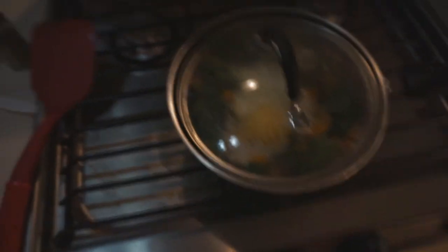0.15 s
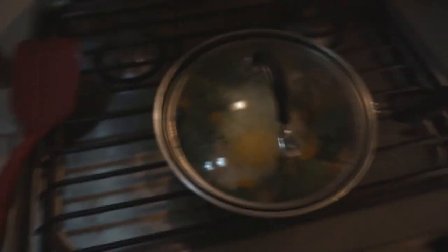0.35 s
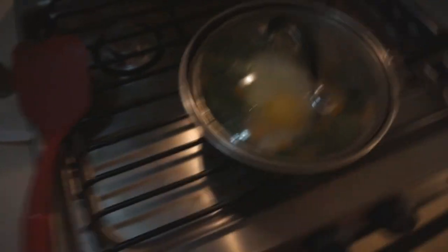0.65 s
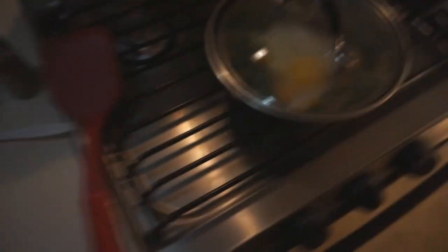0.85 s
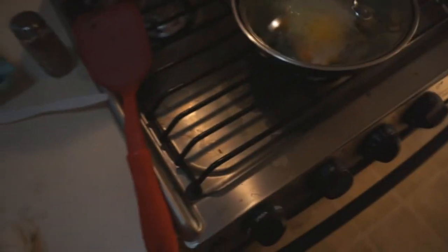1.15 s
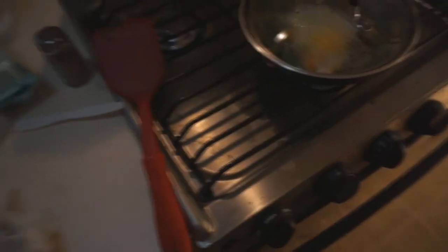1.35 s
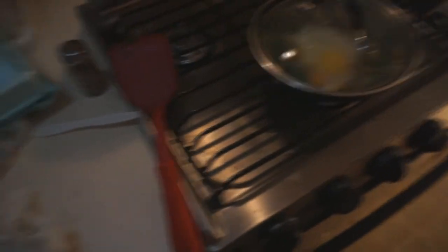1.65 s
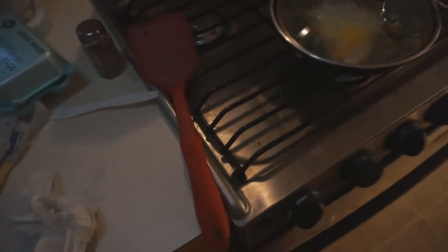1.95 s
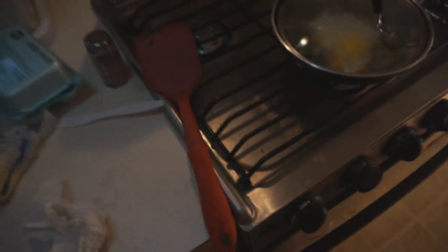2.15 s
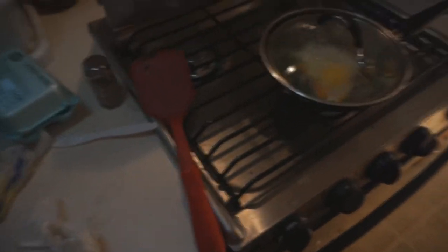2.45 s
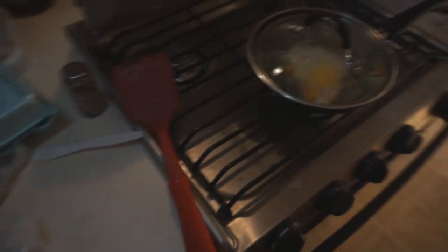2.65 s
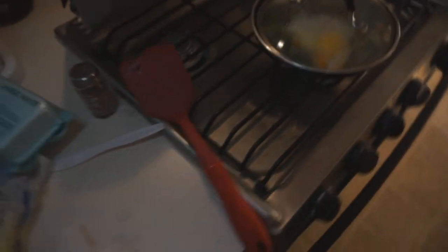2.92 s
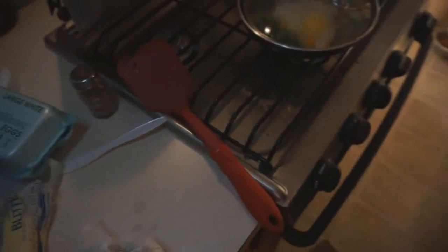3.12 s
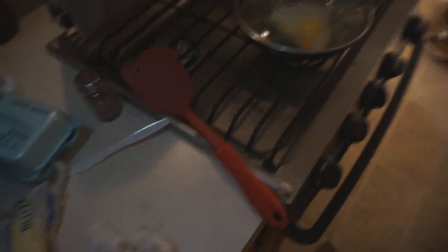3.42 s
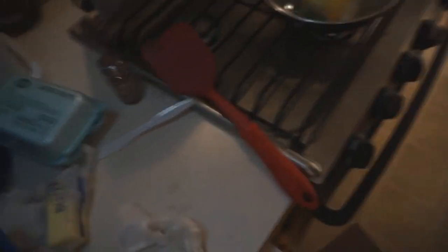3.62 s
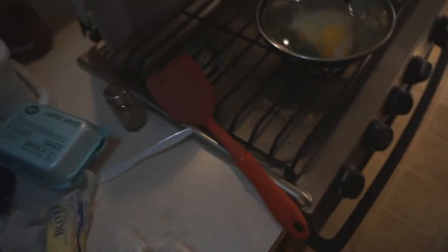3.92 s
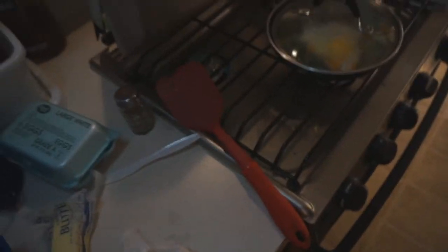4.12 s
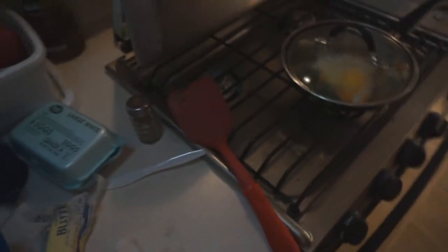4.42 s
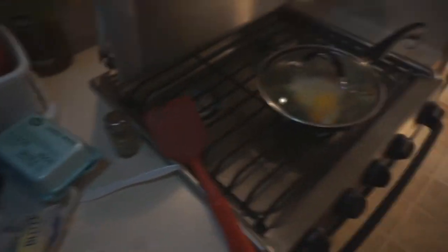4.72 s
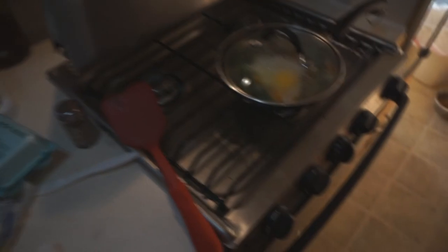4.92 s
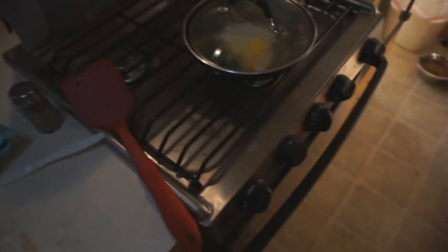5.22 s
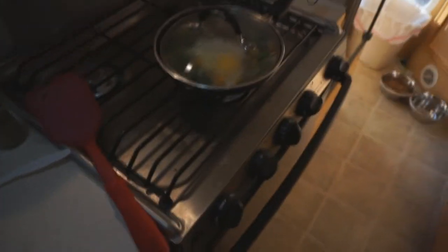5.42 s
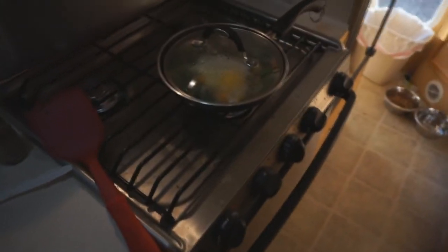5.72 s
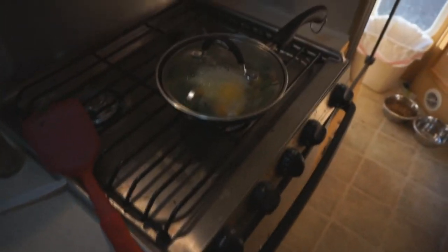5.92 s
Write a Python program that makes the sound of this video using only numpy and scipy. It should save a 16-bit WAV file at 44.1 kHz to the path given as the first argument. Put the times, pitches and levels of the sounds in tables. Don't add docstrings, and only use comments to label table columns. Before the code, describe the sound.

Bright, dense sizzling of an egg and vegetables frying in butter, with constant sharp pops, small bubbling gulps, then knocks and scrapes nearby.

```python
import sys
import numpy as np
from scipy import signal
from scipy.fft import rfft, irfft, next_fast_len
from scipy.io import wavfile
from scipy.ndimage import map_coordinates

SR = 44100
rng = np.random.default_rng(int(sys.argv[2]) if len(sys.argv) > 2 else 0)


def magnitude_from_level(level_db):
    exponent = np.asarray(level_db, float) / 20
    return 10 ** exponent


def generate_wav(signal):
    frames = np.transpose(np.atleast_2d(signal))
    scaled = np.clip(frames, -1, 1) * 32767
    pcm = np.round(scaled).astype(np.int16)
    wavfile.write(sys.argv[1], SR, pcm)


N = 267687

# (time [s], level [dB])
SIZZLE_LEVEL = [
    (0.0, -29.5),
    (0.49, -27),
    (0.81, -28),
    (1.35, -26.5),
    (2.01, -29),
    (3.29, -28.5),
    (4.58, -31),
    (5.41, -30.5),
    (6.07, -31),
]
# (time [s], peak level [dB])
LARGE_POPS = [(0.2389, -3), (0.4115, -8), (0.5144, -8), (0.5784, -7), (0.7173, -8), (0.7696, -8),
              (0.8056, -8), (0.9078, -6), (0.9213, -4), (1.048, -6), (1.2111, -4), (1.2306, -7),
              (1.5574, -8), (1.8173, -8), (1.8507, -8), (2.0624, -9), (2.3486, -9), (2.5262, -10),
              (2.7462, -9), (2.8883, -8), (2.9811, -8), (3.1258, -6), (3.5369, -9), (4.3311, -12),
              (4.6009, -10), (4.9487, -8), (5.2185, -8), (5.2584, -8), (5.464, -9), (5.6151, -9)]
# (burst pitch [Hz], rate [1/s], level [dB], spread of direction [rad])
BUBBLE_SIZES = [(1200, 400, -13.5, 0.47), (2470, 1200, -8.5, 0.19), (5600, 1500, -2.5, 0.11),
                (10400, 4300, 4.5, 0.5), (14500, 3900, 3, 0.53), (7660, 150, -1.5, 1.0)]
# (frequency [Hz], level per Hz [dB])
PAN_SPECTRUM = [(90, -85), (170, -21), (244, -5.5), (398, 0), (600, -2), (736, -8), (1150, -17), (1400, 3),
                (1600, 2.5), (2320, 0.5), (5000, 1.5), (9000, 1.5), (14500, 3.5), (16500, -3.5)]
# (time [s], peak level [dB], pitch [Hz], t60 [s])
STEAM_GULPS = [(0.202, -29.5, 603, 0.056), (0.225, -34, 624, 0.045), (0.315, -34, 364, 0.055),
               (0.401, -27.5, 507, 0.038), (0.419, -34.5, 486, 0.12), (0.485, -20.5, 527, 0.034),
               (0.507, -24.5, 546, 0.033), (0.519, -38, 522, 0.21), (0.731, -30, 460, 0.026),
               (0.829, -48, 604, 0.07), (0.899, -42, 550, 0.083), (1.121, -34, 511, 0.063),
               (1.172, -36, 340, 0.065), (1.253, -39, 720, 0.22), (1.28, -36, 310, 0.064),
               (1.764, -29.5, 392, 0.029), (1.837, -15, 560, 0.016), (2.359, -37, 310, 0.092),
               (2.426, -29.5, 640, 0.05), (2.481, -34, 362, 0.041), (2.563, -45.5, 390, 0.11),
               (2.803, -33.5, 557, 0.058), (2.905, -45, 350, 0.068), (4.449, -37.5, 577, 0.061),
               (5.322, -37, 374, 0.038), (5.351, -41, 370, 0.043), (0.539, -40.5, 821, 0.18),
               (1.031, -30.5, 1570, 0.06)]
# (time [s], peak level [dB], main resonance [Hz], rattle level [dB])
BLOWS = [(1.3255, -4.5, 780, -7.5), (1.3291, -9, 1200, -11), (1.339, -11, 790, -3), (2.325, -17.5, 420, -9),
         (2.727, -25.5, 437, -4), (2.743, -33, 328, 3.5), (3.687, -14.5, 294, 5), (3.785, -8.5, 563, -9),
         (3.831, -10, 1020, 2.5), (4.136, -13, 573, 0), (4.981, -16.5, 663, 5), (4.984, -21.5, 990, 8),
         (5.094, -31, 610, 6.5), (5.239, -25, 880, 4), (5.243, -26, 440, 1), (5.289, -34.5, 490, 7),
         (5.9432, -20, 4400, 3.5), (5.9437, -13, 2890, -10), (5.949, -13, 3160, -11.5),
         (5.957, -22, 2980, -3), (5.985, -26, 2950, 0)]
# (time [s], peak level [dB], main resonance [Hz], rattle level [dB])
SOFT_SCUFFS = [(3.27, -37, 385, -3), (3.298, -27.5, 1500, 11.5), (3.376, -20, 2150, 3),
               (3.397, -27, 1830, 1), (3.692, -17, 2340, -7), (3.747, -15, 1580, -10),
               (3.85, -18.5, 1120, 11.5), (3.872, -26, 1160, 10), (3.907, -25, 1560, -10),
               (3.96, -8, 1680, -2.5), (3.972, -15, 2000, -4), (4.038, -16, 1820, -2),
               (4.097, -32, 1660, 2), (4.137, -14.5, 2420, 2.5), (4.191, -19.5, 2450, 6.5),
               (4.206, -13, 2320, -0.5), (4.226, -18.5, 1350, 3.5), (4.25, -31, 1440, 7),
               (5.559, -36, 1080, -6)]
# (frequency [Hz], level per Hz [dB])
CLATTER_SPECTRUM = [(88, -80), (150, -16.5), (372, -8.5), (713, -5), (922, -10.5), (1210, -2), (1440, -4.5),
                    (6170, -7.5), (9000, -10), (11700, 0), (19800, -120)]
# (frequency [Hz], level [dB], t60 [s])
BOWL_MODES = [(205, -10, .3), (301, -5, .2), (838, 0, .5), (1001, -2, .2), (2230, -8, .08)]
# (time [s], length [s], level [dB])
FLOOR_DRAGS = [
    (3.298, 0.1, -30.5),
    (3.7, 0.43, -20),
]
# (time [s], peak level [dB])
WEIGHT_SHIFTS = [(0.159, -56), (0.299, -81), (0.732, -53), (0.896, -67), (1.178, -50), (1.333, -29.5),
                 (1.549, -64), (1.716, -48.5), (1.838, -50), (2.146, -67), (2.332, -46), (2.444, -45.5),
                 (2.549, -60), (2.734, -37), (2.797, -50), (3.089, -69), (3.295, -43.5), (3.401, -43.5),
                 (3.689, -21), (3.79, -40), (3.959, -38.5), (4.158, -40), (4.299, -54), (4.448, -58),
                 (4.973, -54), (5.089, -53), (5.244, -59), (5.499, -64), (5.694, -79), (5.946, -38.5)]
# (frequency [Hz], width [Hz], level [dB])
FLOOR_MODES = [(113, 21, 36), (190, 60, -50)]
# (frequency [Hz], level [dB])
RUMBLE_SPECTRUM = [(20, -33), (60, 13.5), (120, -9), (200, 0), (400, -12.5), (800, -90)]
# (frequency [Hz], left-right likeness [-1 to 1])
LIKENESS = [(60, 0.3), (180, 0.94), (550, 0.3), (1650, 0.65), (4970, 0.13), (15000, 0.19)]
# (frequency [Hz], lead of the left [rad])
LEFT_LEAD = [(0, 0.9), (2840, 0.27), (11900, 0.45), (15900, -1.5)]
# (frequency [Hz], left gain [Np], the right has the opposite)
LEFT_GAIN = [(2000, -0.086), (14000, -0.015)]
# (frequency [Hz], t60 [s])
CABIN_T60 = [(200, 0.21), (2000, 0.092), (12000, 0.025)]
# (frequency [Hz], t60 [s])
STOVE_T60 = [(1000, 0.042), (12000, 0.048)]
# (frequency [Hz], width [Hz], depth [0-1])
ECHO_NOTCHES = [(1760, 260, .92), (3450, 240, .55)]
# (frequency [Hz], level [dB])
MIC_RESPONSE = [(20, -26), (60, -14), (110, 0), (15900, 0), (16150, -30), (16500, -90)]
# (time [s], left-right level [dB])
CAMERA_TURN = [(0.0, 2), (1.98, 0), (2.59, -0.5), (3.41, 1), (4.18, -1), (4.46, 0), (4.77, -1.5),
               (5.14, 1.5), (5.68, 5), (6.07, 3.5)]
# (time [s], drop [dB], negative means none)
GAIN_DROPS = [(.115, 1.5), (0.239, 1.5), (.446, 2.5), (.58, 0.5), (0.702, 4.5), (0.925, 2.5), (1.05, 1.5),
              (1.324, 2.5), (1.558, 1.5), (1.817, 2.5), (1.87, 2), (2.021, 2), (2.292, 1), (2.44, 0.5),
              (2.82, 0.5), (2.931, 3), (3.129, 2), (3.44, 0), (3.535, 2.5), (3.73, 1.5), (3.89, 2),
              (4.28, 1), (4.333, 2.5), (4.603, 0.5), (4.69, 1), (4.952, 1), (5.19, -14), (5.617, 3),
              (5.99, 1)]

SPITS, SPIT_DB, SPIT_SPREAD_DB = 240, -8.5, 3.5
BODY_DB, BODY_SPREAD_DB = -9, 4
KNOCK_RISE_S, KNOCK_T60_S = 0.0007, 0.047
SCUFF_RISE_S, SCUFF_T60_S = 0.0038, 0.1
DRAG_RISE_DB_PER_S, DRAG_FADE_DB_PER_S = 302, 60
STEP_RISE_S, STEP_FADE_DB_PER_S, SHUFFLE_DB, THUD_DB = 0.018, 121, -0.5, -2
DUCK_FALL_S, DUCK_RETURN_S = 0.0046, 0.04


def unit(x):
    return x / np.sqrt(np.mean(x ** 2) + 1e-20)


def along(points, hz):
    f, v = np.transpose(points)
    return np.interp(np.log(hz + 1), np.log(f + 1), v)


def curve(points):
    s, v = np.transpose(points)
    return np.interp(np.arange(N) / SR, s, v)


def wobble(rate):
    knots = rng.standard_normal(int(N * rate / SR) + 4)
    return map_coordinates(knots, [np.arange(N) * rate / SR])


def filtered(x, response):
    n = x.shape[-1]
    m = next_fast_len(n + 4096)
    spectrum = rfft(x, m) * response(np.fft.rfftfreq(m, 1 / SR))
    return irfft(spectrum, m)[..., :n]


def colour(points):
    return lambda hz: magnitude_from_level(along(points, hz))


def resonance(hz, centre_hz, width_hz):
    damping = 1j * hz * width_hz
    return damping / (centre_hz ** 2 - hz ** 2 + damping)


def sides(pan_db):
    return magnitude_from_level(np.array([pan_db / 2, -pan_db / 2]))


def stereo_noise():
    def split(hz):
        angle = np.arccos(np.clip(along(LIKENESS, hz), -1, 1)) / 2
        return np.array([np.cos(angle), np.sin(angle)])
    mid, side = filtered(rng.standard_normal((2, N)), split)
    return np.array([mid + side, mid - side])


def reverberate(x, t60s):
    hz, t, z = signal.stft(rng.standard_normal((2, SR // 4)), SR, nperseg=128)
    decay = magnitude_from_level(-60 * t / along(t60s, hz)[:, None])
    tail = signal.istft(z * decay, SR, nperseg=128)[1]
    tail = tail / np.linalg.norm(tail[0])
    delayed = np.pad(x, (60, 0))[None]
    return signal.fftconvolve(delayed, tail, axes=1)[:, :N]


def sizzle():
    level_db = curve(SIZZLE_LEVEL)
    source = crackle(level_db) + pops()
    walls = magnitude_from_level(-13) * reverberate(source[0], STOVE_T60) + magnitude_from_level(-9) * reverberate(source[1], CABIN_T60)
    hiss_gain = magnitude_from_level(level_db - 5.5 + 1.2 * wobble(30))
    hiss = hiss_gain * unit(filtered(stereo_noise(), colour(PAN_SPECTRUM)))

    def path(hz):
        between_ears = .5j * along(LEFT_LEAD, hz) + along(LEFT_GAIN, hz)
        notches = np.prod([1 - depth * resonance(hz, c, w) for c, w, depth in ECHO_NOTCHES], axis=0)
        return np.exp(between_ears * np.array([[1], [-1]])) * notches
    return sides(curve(CAMERA_TURN)) * filtered(source + walls + hiss, path)


def crackle(level_db):
    clumps = sputter(90, life=.0007, boost=2.5)
    total = np.zeros((2, N))
    for hz, rate, db, width in BUBBLE_SIZES:
        total += magnitude_from_level(db + 0.96 * wobble(7)) * unit(bursts(hz, rate, 1.1, clumps, width))
    return magnitude_from_level(level_db + 1.5) * unit(filtered(total, colour(PAN_SPECTRUM)))


def sputter(per_second, life, boost):
    beat = np.cumsum(per_second * magnitude_from_level(5 * wobble(60)) / SR)
    starts = np.diff(np.floor(beat), prepend=0) * rng.uniform(0.17, 1.6, size=N)
    swarm = np.exp(-np.abs(np.arange(-300, 301)) / (life * SR))
    return .5 + boost * np.convolve(starts, swarm, "same")


def bursts(centre_hz, per_second, spread_db, clumps, width):
    draw = rng.random((3, N))
    hit = draw[0] < per_second * clumps / SR
    size = np.minimum(-np.log(draw[1] + 1e-9), 3)
    clicks = hit * magnitude_from_level(spread_db * size) * np.sign(draw[2] - .5)
    direction = np.pi / 4 + width * rng.standard_normal(N)
    stereo = clicks * np.array([np.cos(direction), np.sin(direction)])
    return filtered(stereo, lambda hz: resonance(hz, centre_hz, 0.78 * centre_hz))


def pops():
    out, t = np.zeros((2, N + SR)), np.arange(400) / SR
    times = rng.random(SPITS) * N / SR
    peaks = SPIT_DB - SPIT_SPREAD_DB * np.abs(rng.standard_normal(SPITS))
    for s, db in [*LARGE_POPS, *zip(times, peaks)]:
        spray = rng.standard_normal((4, len(t)))
        tear_and_droplets = magnitude_from_level(-60 * t / 0.0012) + 0.11 * magnitude_from_level(-60 * t / 0.024)
        snap = (spray[0] + 1.17 * spray[1:3]) * tear_and_droplets
        body = filtered(spray[3] * magnitude_from_level(-60 * t / 0.0081), lambda hz: resonance(hz, 2680, 1900))
        snap_hz = 13200 * magnitude_from_level(-5 * rng.random() ** 4)
        pop = filtered(snap, lambda hz: resonance(hz, snap_hz, .75 * snap_hz))
        pop = pop + magnitude_from_level(rng.normal(BODY_DB, BODY_SPREAD_DB)) * body
        out[:, round((s + .001) * SR):][:, :len(t)] += magnitude_from_level(db) * pop / np.abs(pop.mean(0)).max()
    return out[:, :N]


def steam():
    out, t = np.zeros(N + SR), np.arange(SR // 8) / SR
    for s, db, hz, t60 in STEAM_GULPS:
        breath = unit(filtered(rng.standard_normal(len(t)), lambda f: resonance(f, hz, .5 * hz)))
        tone = np.sin(2 * np.pi * hz * t * (1 + 0.5 * t)) + 0.62 * breath
        out[round(s * SR):][:len(t)] += magnitude_from_level(db - 60 * t / t60) * tone * (1 - np.exp(-t / 0.0033))
    return out[:N] + magnitude_from_level(-2.5) * reverberate(out[:N], CABIN_T60)


def knocks():
    out, t = np.zeros((2, N + SR)), np.arange(SR // 4) / SR
    impacts = [(*row, KNOCK_RISE_S, KNOCK_T60_S, 2) for row in BLOWS]
    impacts += [(*row, SCUFF_RISE_S, SCUFF_T60_S, 0) for row in SOFT_SCUFFS]
    for s, db, hz, rattle_db, rise, t60, hardness in impacts:
        jolt = rng.standard_normal((4, len(t)))
        ring = filtered(jolt[0] + .5 * jolt[2:], lambda f: resonance(f, hz, min(0.41 * hz, 800)) ** 2)
        rattle = filtered(jolt[1] + 0.78 * jolt[2:],
                          lambda f: colour(CLATTER_SPECTRUM)(f) / (1 + (f / (2500 + 2 * hz)) ** 2))
        strike = hardness * np.sin(2 * np.pi * hz * t) * magnitude_from_level(-60 * t / .022)
        envelope = magnitude_from_level(-60 * t / t60 - 7.5) * (1 - np.exp(-t / rise))
        blow = (unit(ring) + strike + magnitude_from_level(rattle_db) * unit(rattle)) * envelope
        out[:, round(s * SR):][:, :len(t)] += magnitude_from_level(db) * blow
    bowl = ringing_bowl()
    out[:, round(BLOWS[0][0] * SR):][:, :len(bowl)] += magnitude_from_level(-29.5) * bowl
    return sides(11.3)[:, None] * out[:, :N] + magnitude_from_level(-3) * reverberate(out[0, :N], CABIN_T60)


def ringing_bowl():
    t = np.arange(SR // 2) / SR
    return sum(magnitude_from_level(db - 60 * t / t60) * np.sin(2 * np.pi * hz * t) for hz, db, t60 in BOWL_MODES)


def scrape():
    t, level = np.arange(N) / SR, np.zeros(N)
    for s, length, db in FLOOR_DRAGS:
        before = np.clip(s - t, 0, None)
        after = np.clip(t - s - length, 0, None)
        level += magnitude_from_level(db - DRAG_RISE_DB_PER_S * before - DRAG_FADE_DB_PER_S * after)
    rubbing = filtered(stereo_noise(), lambda f: colour(CLATTER_SPECTRUM)(f) / (1 + (f / 4500) ** 2))
    grit = magnitude_from_level(2.5 * wobble(250) + 2.5 * wobble(45)) * rubbing
    return sides(3.4)[:, None] * magnitude_from_level(-6) * level * unit(grit)


def shuffle():
    weight, t = np.zeros(N), np.arange(SR) / SR
    for s, db in WEIGHT_SHIFTS:
        weight[round(s * SR)] = magnitude_from_level(db)
    boards = sum(magnitude_from_level(db - 28.5) * np.sin(2 * np.pi * hz * t) * np.exp(-np.pi * width * t)
                 for hz, width, db in FLOOR_MODES)
    boards = boards * (1 - np.exp(-t / 0.003))
    fade = magnitude_from_level(-STEP_FADE_DB_PER_S * t) * (1 - np.exp(-t / STEP_RISE_S))
    noise = rng.standard_normal(N) + .5 * rng.standard_normal((2, N))
    low = unit(filtered(noise, colour(RUMBLE_SPECTRUM)))
    rumble = signal.fftconvolve(weight, fade)[:N] * magnitude_from_level(SHUFFLE_DB + 3 * wobble(12)) * low
    return rumble + magnitude_from_level(THUD_DB) * signal.fftconvolve(weight, boards)[:N]


def scene():
    return sizzle() + steam() + knocks() + scrape() + shuffle()


def ducking():
    drops, t = np.zeros(N), np.arange(SR // 2) / SR
    for s, drop_db in GAIN_DROPS:
        drops[round(s * SR)] = -max(drop_db, 0)
    dip = 2.47 * (1 - np.exp(-t / DUCK_FALL_S)) * np.exp(-t / DUCK_RETURN_S)
    return signal.fftconvolve(drops, dip)[:N]


def roll_off(x):
    return signal.sosfilt(signal.butter(12, 16380, fs=SR, output="sos"), x)


def record(dry):
    mic = colour(MIC_RESPONSE)
    mid = filtered(dry.mean(0), mic)
    side = filtered((dry[0] - dry[1]) / 2, lambda hz: mic(hz) * (.1 + hz ** 2 / (hz ** 2 + 600 ** 2)))
    heard = np.array([mid + side, mid - side]) * magnitude_from_level(ducking())
    heard = heard / (1 + (heard / .75) ** 4) ** .25
    return roll_off(heard)


dry = scene()
out = record(dry)
generate_wav(out)
```